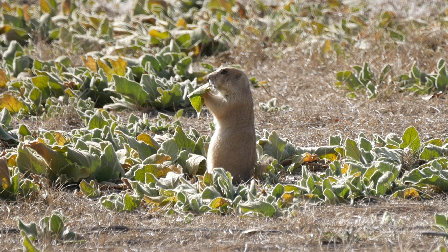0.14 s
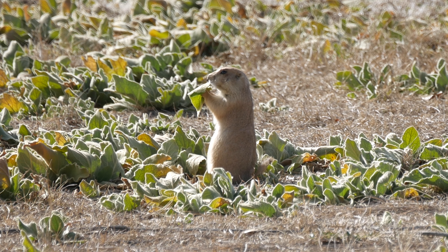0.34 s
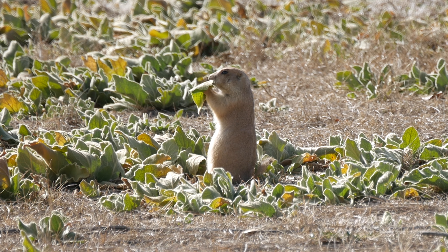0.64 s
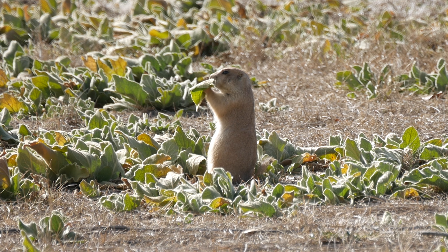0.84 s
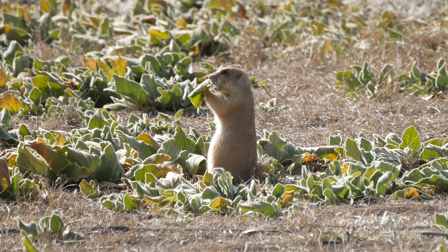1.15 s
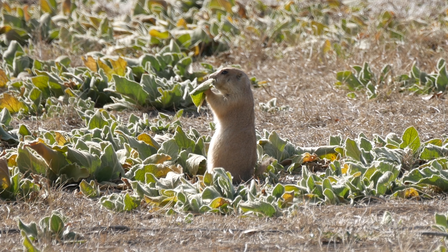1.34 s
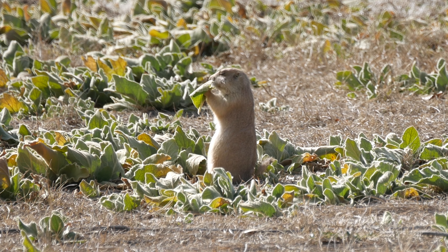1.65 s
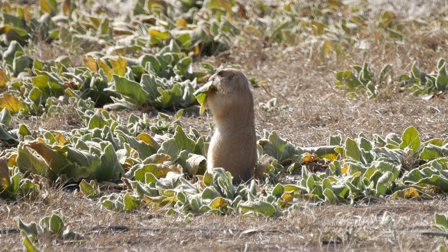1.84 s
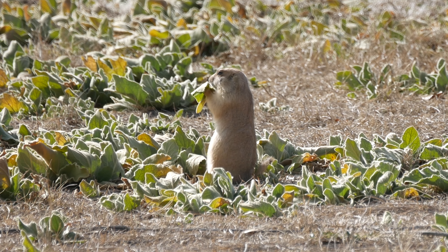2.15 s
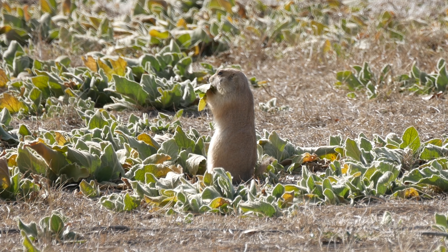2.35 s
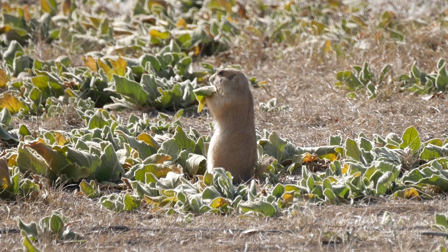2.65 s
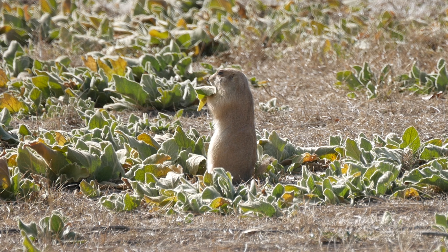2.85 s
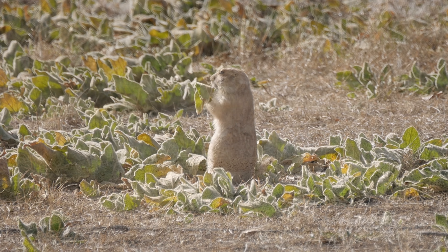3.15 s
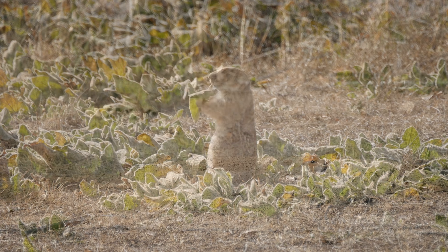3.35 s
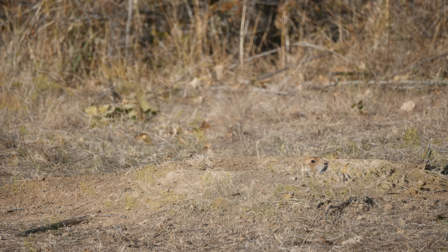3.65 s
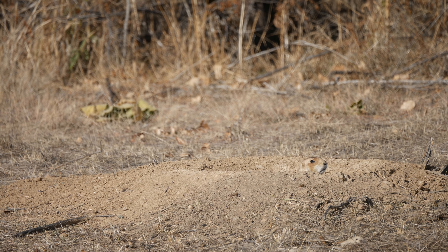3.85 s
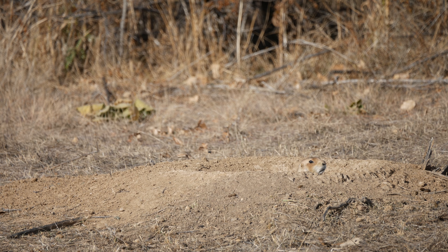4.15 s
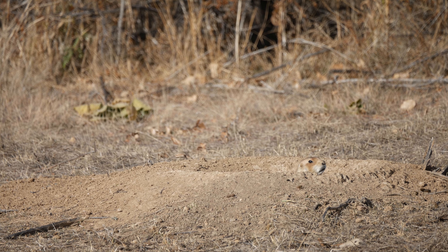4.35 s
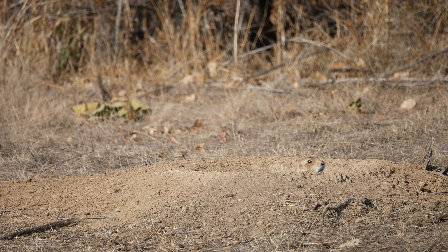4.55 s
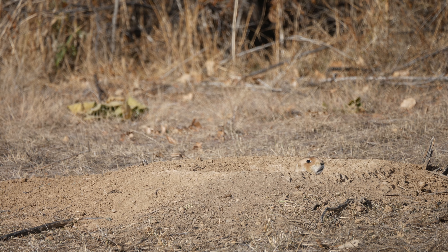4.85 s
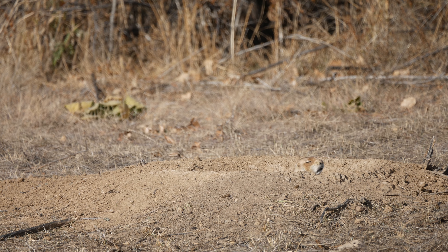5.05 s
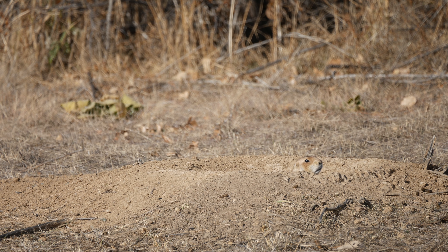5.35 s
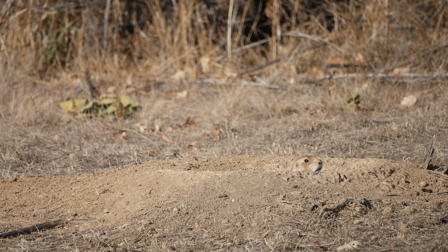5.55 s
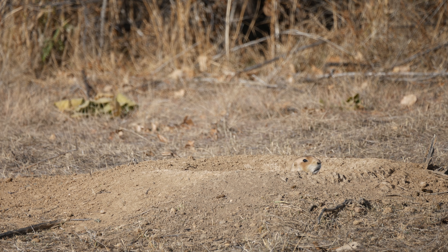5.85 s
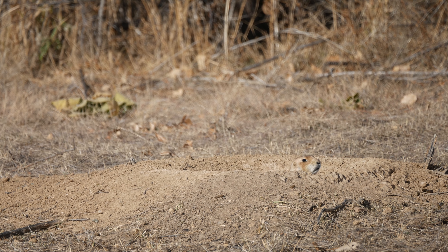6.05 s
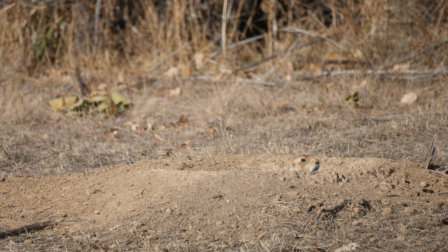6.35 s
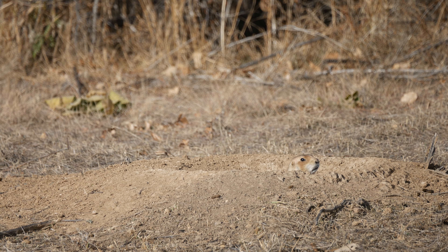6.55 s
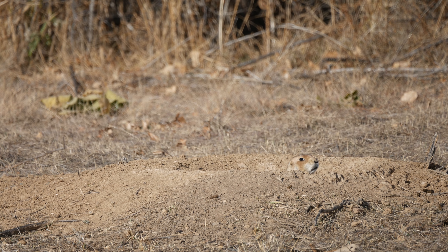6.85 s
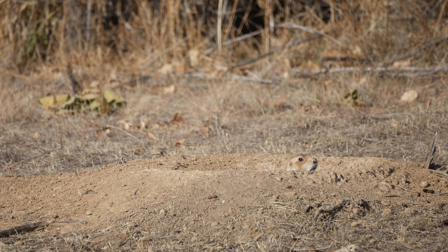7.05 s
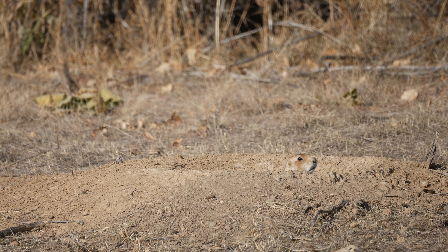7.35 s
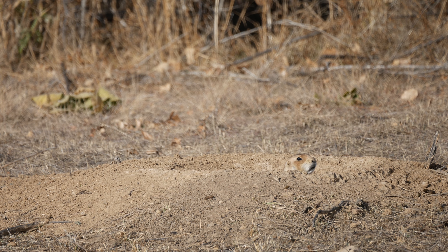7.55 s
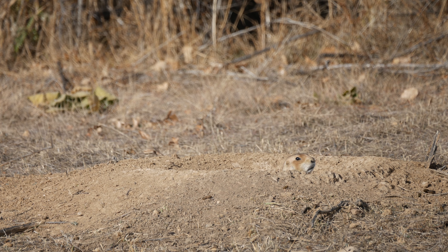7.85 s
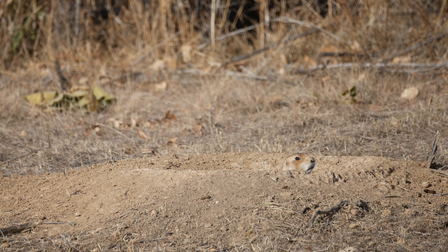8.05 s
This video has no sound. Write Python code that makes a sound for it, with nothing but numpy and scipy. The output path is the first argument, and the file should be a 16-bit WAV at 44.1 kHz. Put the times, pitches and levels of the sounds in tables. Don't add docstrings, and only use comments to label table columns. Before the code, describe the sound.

From 0 to 2.9 s, a distant prairie dog barks eight times in open grassland, short high yaps at irregular gaps of about a third to six tenths of a second, with a diffuse outdoor tail. Calm air and a faint low engine hum lie beneath. A dry snap comes near 0.5 s, a neighbour's rising yip at 0.7 s, and tiny wheezes around 1.2-1.4 s. The last far bark, at 2.9 s, is loudest; then silence until 3.2 s. Abruptly a close animal barks, hard, piercing and hoarse, repeating roughly every 0.4 s, with a longer gap around 5.6-6.2 s. Later barks are softer, lower and clearer, with thin falling wheezes after most. Wind rushes low over the microphone, thumping and droning, swelling near 5.4 and 7.3 s. Grass rustles early; stems snap around 6 s. After the last bark at 8.0 s, a quick arching chirp closes.

```python
import sys
import numpy as np
from scipy import signal
from scipy.fft import rfft, irfft, next_fast_len
from scipy.io import wavfile
from scipy.ndimage import uniform_filter1d

SR = 44100
rng = np.random.default_rng(int(sys.argv[2]) if len(sys.argv) > 2 else 0)


def int16_out(signal):
    q = np.round(np.clip(np.atleast_2d(signal).T, -1, 1) * 32767)
    wavfile.write(sys.argv[1], SR, q.astype(np.int16))


def elevation(decibels):
    levels = np.asarray(decibels, float)
    return 10 ** (levels / 20)


N = 362061
T = np.arange(N) / SR
SIZE = next_fast_len(N)
HZ = np.maximum(np.arange(SIZE // 2 + 1) * SR / SIZE, 1.)


def white():
    return rng.standard_normal(N)


def unit(x):
    return x / np.sqrt(np.mean(x ** 2))


def colour(x, points):
    hz, db = np.transpose(points)
    gain_db = np.interp(np.log(HZ), np.log(hz), db, left=-90, right=-90)
    return irfft(rfft(x, SIZE) * elevation(gain_db), SIZE)[:N]


def resonate(x, points):
    hz, db = np.transpose(points)
    grid_hz = np.maximum(np.arange(1025) * SR / 2048, 1.)
    gain_db = np.interp(np.log(grid_hz), np.log(hz), db, left=-70, right=-70)
    cepstrum = irfft(gain_db * np.log(10) / 20)
    cepstrum[1:1024] *= 2
    cepstrum[1025:] = 0
    impulse = irfft(np.exp(rfft(cepstrum)))
    return signal.oaconvolve(x, impulse)[:N]


def walk(rate_hz):
    hold = int(SR / rate_hz)
    steps = np.repeat(rng.standard_normal(N // hold + 1), hold)
    return 1.57 * uniform_filter1d(uniform_filter1d(steps, hold), hold)[:N]


def steady(x, seconds):
    size = int(seconds * SR)
    return x / np.sqrt(uniform_filter1d(uniform_filter1d(x ** 2, size), size))


def swells(rest_db, rows):
    bells = sum(elevation(db) ** 2 * np.exp(-((T - s) / wide_s) ** 2) for s, wide_s, db in rows)
    return np.sqrt(elevation(rest_db) ** 2 + bells)


def air(points, flicker_db, rate_hz):
    whole, out = rfft(colour(white(), points), SIZE), 0
    lowest, highest = np.floor(np.log2(points[0][0])), np.log2(points[-1][0])
    for octave in np.arange(lowest, highest + 1):
        band = irfft(whole * np.clip(1 - abs(np.log2(HZ) - octave), 0, 1), SIZE)[:N]
        out = out + band * elevation(flicker_db * walk(rate_hz))
    return unit(out)


def hiss():
    # hz, density_db
    hiss_spectrum = [(900, -14.5), (1500, 10.5), (3000, -10.5), (7000, -2.5), (12000, -1.5), (15600, 0.5)]
    return elevation(-81.5) * unit(colour(white(), hiss_spectrum))


def engine_hum():
    # order_hz, level_db
    orders = [(50.5, -69.5), (101, -71), (203, -76)]
    wavering = 1 + .006 * walk(2)
    out = np.zeros(N)
    for hz, db in orders:
        phase = 2 * np.pi * np.cumsum(hz * wavering) / SR
        out += elevation(db + 2 + 1.1 * walk(4.0)) * np.sin(phase)
    return out


def calm_air():
    # hz, density_db
    calm_spectrum = [(12, -30), (20, -11.5), (101, 4), (157, -9), (252, -13.5), (520, -16), (812, -15.5),
                     (1070, -21), (1230, -19), (2150, -29), (2760, -28.5), (3650, -36.5), (5550, -37),
                     (14300, -40), (15500, -41.5)]
    return elevation(-60.5) * air(calm_spectrum, flicker_db=0.34, rate_hz=7.76)


def membrane_thumps():
    # hz, density_db
    buffet_spectrum = [(12, 10.5), (22, 2), (40, -8), (60, -18), (100, -26)]
    # start_s, level_db
    eddies = [(3.29, -44), (3.5, -42), (3.66, -40.5), (3.77, -36), (4.05, -38.5), (4.16, -38), (4.33, -46),
              (4.5, -42), (4.74, -41), (4.92, -43.5), (5.02, -40), (5.4, -43.5), (5.55, -40), (5.7, -40.5),
              (5.85, -43), (5.99, -42.5), (6.15, -40), (6.44, -42.5), (6.62, -42), (6.76, -40),
              (6.99, -46.5), (7.2, -47), (7.52, -46), (7.64, -41)]
    gain = swells(-52, [(s, 0.047, db) for s, db in eddies])
    return gain * steady(colour(white(), buffet_spectrum), seconds=0.065)


def housing_drone(gust_db):
    # hz, density_db
    drone_spectrum = [(40, -8), (65, -4), (100, 0.2), (150, -7), (210, -4.5), (300, -19.5)]
    # centre_s, half_width_s, level_db
    drone_swells = [
        (3.85, .15, -53.5),
        (5.85, 0.73, -50),
        (6.8, .15, -48.5),
        (7.2, 0.074, -51),
    ]
    gain = swells(-53, drone_swells) * elevation(0.16 * (gust_db + 45.5) + 1.7 * walk(9))
    return gain * steady(air(drone_spectrum, flicker_db=1.0, rate_hz=18), seconds=0.15)


def gust_rush(gust_db):
    # hz, density_db
    rush_spectrum = [(88, -40), (150, -12), (255, -6.5), (369, 0.5), (473, -0.5), (581, -3.5), (907, -23),
                     (1060, -25.5), (1340, -37.5), (1810, -83), (2000, -56.5), (2600, -71.5), (4400, -120)]
    return elevation(gust_db + 0.18) * steady(air(rush_spectrum, flicker_db=1.5, rate_hz=20), seconds=0.1)


def grass_rustle():
    # hz, density_db
    rustle_spectrum = [(900, -2.5), (1300, 5.5), (2000, -0.5), (3000, -0.5), (4500, -5), (6000, -2),
                       (7000, -8), (11000, -12.5), (15500, -22)]
    # centre_s, half_width_s, level_db
    stirs = [
        (3.37, 0.075, -73),
        (3.55, 0.17, -73),
        (4.18, 0.077, -82),
        (5.42, 0.12, -79.5),
        (6.18, 0.07, -76.5),
        (6.46, 0.069, -82),
        (6.99, 0.026, -82),
        (7.52, .1, -86),
        (8.21, .05, -77),
    ]
    gain = elevation(7) * swells(-84.5, stirs)
    return gain * steady(air(rustle_spectrum, flicker_db=.7, rate_hz=35), seconds=.15)


def wind():
    # time_s, strength_db
    gusts = [(3.18, -41.5), (3.5, -47), (3.63, -50.5), (4.06, -46.5), (4.08, -43), (4.9, -51),
             (5.38, -39.5), (6.08, -45.5), (6.34, -43.5), (6.65, -48.5), (6.95, -45), (7.17, -38.5),
             (7.38, -37), (7.49, -46.5), (7.8, -48), (7.84, -52), (7.91, -47.5), (8.21, -49.5)]
    gust_db = np.interp(T, *np.transpose(gusts))
    return membrane_thumps() + housing_drone(gust_db) + gust_rush(gust_db) + grass_rustle()


def stem_ticks():
    # start_s, level_db, ring_hz
    snaps = [
        (0.489, -46, 2860),
        (3.3994, -57, 1210),
        (5.93, -51, 1220),
        (6.0704, -49, 1300),
        (6.106, -46, 1390),
    ]
    out, t = np.zeros(N), np.arange(400) / SR
    for s, db, hz in snaps:
        start = int(s * SR)
        body = 1.3 * rng.standard_normal(len(t)) + np.sin(2 * np.pi * hz * t)
        out[start:start + len(t)] += elevation(db) * np.exp(-t / 0.0016) * body
    return resonate(out, [(500, -23), (1300, -2.5), (4000, -13.0), (14000, -18)])


def field(x, spray_db, spray_t60_s, bank_s, bank_db, tail_db, tail_t60_s):
    t = np.arange(int(.6 * SR)) / SR
    spray, bank, tail = rng.standard_normal((3, len(t)))

    def decay(t60_s, lag_s):
        fall = elevation(-60 * np.maximum(t - lag_s, 0) / t60_s)
        return (t > lag_s) * fall / np.sqrt(t60_s * SR)

    hump = np.exp(-((t - bank_s) / .03) ** 2) / np.sqrt(.04 * SR)
    tail = signal.sosfilt(signal.butter(1, 4500, fs=SR, output="sos"), tail)
    answer = elevation(spray_db) * spray * decay(spray_t60_s, 0.011)
    answer += elevation(bank_db) * bank * hump
    answer += elevation(tail_db) * tail * decay(tail_t60_s, 0.062)
    return x + signal.fftconvolve(x, answer)[:N]


def voice(calls, throat, jitter, breath_db, patchy_db, odd_db=0):
    # hz, level_db
    flutter_spectrum = [(60, -9), (200, -7), (480, -15), (680, -2), (780, 0), (900, -12), (1500, -26),
                        (3000, -40)]
    throat_hz, throat_db = np.transpose(throat)
    flutter = unit(resonate(white(), flutter_spectrum))
    wobble, patches, breath, source = walk(400), walk(90), white(), np.zeros(N)
    for call in calls:
        s, hz, db, hoarse = np.transpose(call)
        span = slice(int(s[0] * SR), min(int(s[-1] * SR), N))
        hz, db, hoarse = (np.interp(T[span], s, column) for column in (hz, db, hoarse))
        hz = uniform_filter1d(hz, 150, mode="nearest") * (1 + jitter * (1 + 6 * hoarse) * wobble[span])
        k = np.arange(1, int(15500 / hz.max()) + 1)[:, None]
        phase = 2 * np.pi * np.cumsum(hz) / SR + .3 * hoarse * flutter[::-1][span]
        own_patch = patches[(np.arange(span.start, span.stop) + 9000 * k) % N]
        own_db = patchy_db * own_patch + odd_db * (k % 2) * (k > 3)
        stack = (elevation(own_db) * np.cos(k * phase + 0.33 * k ** 2)).sum(axis=0)
        share = np.clip(hoarse, 0, .95)
        stack *= np.sqrt(1 - share ** 2) + share * unit(flutter[span])
        stack += elevation(breath_db) * breath[span]
        partial_db = np.interp(np.log(k * hz.mean()), np.log(throat_hz), throat_db, left=-90, right=-90)
        through = np.sqrt(np.sum(elevation(partial_db) ** 2) / 2)
        source[span] += stack * elevation(db) / through
    return resonate(source, throat)


def wheezes():
    # start_s, length_s, start_hz, level_db
    breaths = [(1.194, 0.053, 1283, -73), (1.377, 0.039, 1290, -74), (4.195, 0.043, 1275, -69),
               (4.634, .035, 1305, -72), (4.971, 0.039, 1090, -66.5), (5.011, 0.058, 1130, -63.5),
               (5.322, .015, 1020, -72), (5.349, 0.046, 1000, -73), (5.693, .012, 1135, -63.5),
               (5.713, 0.068, 1095, -66.5), (6.35, 0.028, 1016, -69), (6.386, 0.04, 1100, -70.5),
               (6.694, 0.026, 1050, -67), (6.727, .045, 1100, -68), (7.072, 0.018, 1190, -63.5),
               (7.109, 0.056, 1128, -64), (7.476, 0.026, 1185, -62), (7.508, 0.053, 1170, -65),
               (7.844, 0.036, 1190, -62.5), (7.889, 0.035, 1172, -64.5)]
    # hz, level_db
    throat = [(600, -48.5), (1100, 4.5), (2200, 4.5), (3300, -4.5), (4500, -17.5), (7000, -27)]
    hoarse, calls = .14, []
    for s, length_s, hz, db in breaths:
        end_hz = 0.93 * hz
        calls.append([(s, hz, db, hoarse), (s + 0.19 * length_s, hz, db, hoarse),
                      (s + .8 * length_s, end_hz, db - 3.5, hoarse), (s + length_s, end_hz, db - 9.5, hoarse)])
    return voice(calls, throat, jitter=.006, breath_db=2, patchy_db=2)


def neighbour_yip():
    # time_s, pitch_hz, level_db, hoarseness_0_1
    contour = [
        (.628, 476, -79, .1),
        (.64, 490, -65, .1),
        (.658, 527, -54.5, .12),
        (.7, 608, -48.5, 0.1),
        (.718, 641, -45.5, .1),
        (.738, 728, -47, 0.2),
        (.75, 809, -47.5, .15),
        (.762, 718, -57, .2),
        (.775, 640, -65, .2),
    ]
    # hz, level_db
    throat = [(450, -40), (700, -14), (1100, -12), (1600, -1), (2000, -8.5), (2550, 2), (3100, -12),
              (3700, -13), (4900, -5), (6000, -13.5), (7600, -23), (8400, -31), (10000, -21), (14000, -53)]
    yip = voice([contour], throat, jitter=.004, breath_db=1, patchy_db=1.8, odd_db=-6)
    return field(yip, spray_db=0, spray_t60_s=.09, bank_s=.05, bank_db=-20, tail_db=-19, tail_t60_s=.4)


def closing_chirp():
    # time_s, pitch_hz, level_db, hoarseness_0_1
    contour = [
        (8.08, 1460, -59, .05),
        (8.095, 1840, -54, 0.1),
        (8.115, 2140, -58, 0.14),
        (8.13, 1950, -55, .05),
        (8.148, 1535, -66, .05),
        (8.16, 1240, -61, .05),
    ]
    # hz, level_db
    throat = [(800, -3), (2000, 8), (4000, -12), (6200, -16), (9000, -40)]
    return voice([contour], throat, jitter=.004, breath_db=-4, patchy_db=3)


def bark_contours(rows):
    # length_share, hard_rise_0_1, soft_rise_0_1 (from end pitch to top), level_db, hoarseness_share
    bark_shape = [
        (0, 0.21, 0.095, -14, .1),
        (.04, 0.3, 0.34, -8, .1),
        (0.161, .92, .6, -3, 0.18),
        (.27, 1, .92, -2, 0.92),
        (.42, .86, 0.97, -2.5, 0.96),
        (.66, .68, 0.79, -5.5, 0.47),
        (.84, .45, 0.663, -8, 0.15),
        (.95, 0, 0.025, -12.5, .4),
        (1.02, -.3, -0.59, -34, .9),
    ]
    share, hard_rise, soft_rise, shape_db, hoarse_share = np.transpose(bark_shape)
    contours = []
    for s, length_s, top_hz, db, hoarse in rows:
        end_hz = 1306.7 + 50.3 * hoarse
        hardness = np.clip((top_hz - 1440) / 150, 0, 1)
        rise = soft_rise + (hard_rise - soft_rise) * hardness
        pitch_hz = end_hz + (top_hz - end_hz) * rise
        contours.append(np.transpose([s + length_s * share, pitch_hz, db + shape_db, hoarse * hoarse_share]))
    return contours


def far_barks():
    # start_s, length_s, top_hz, level_db, hoarseness_0_1
    far_rows = [
        (.043, 0.056, 1373, -51.5, 0.06),
        (.380, 0.061, 1433, -48.5, 0.63),
        (1.002, 0.058, 1442, -50.5, 0.24),
        (1.435, 0.042, 1399, -51, .15),
        (1.796, 0.049, 1524, -47, 0.28),
        (2.163, 0.0548, 1482, -48.5, 0.3),
        (2.523, 0.053, 1426, -49.5, 0),
        (2.882, 0.083, 1494, -45, 0.15),
    ]
    # hz, level_db
    throat = [(1000, -38), (1450, -9), (2100, -5), (2800, 9), (3500, 0.5), (4250, -6.5), (4900, -7.5),
              (5700, 4.5), (7100, 1), (7900, -24), (8600, -17.5), (11000, -24.5), (15000, -36.5)]
    return voice(bark_contours(far_rows), throat, jitter=.007, breath_db=-4, patchy_db=2.5)


def near_barks():
    # start_s, length_s, top_hz, level_db, hoarseness_0_1
    near_rows = [(3.180, 0.058, 1723, -24, 0.57), (3.653, 0.065, 1624, -26.5, 0.85),
                 (4.018, 0.067, 1623, -25.5, 0.55), (4.443, 0.062, 1677, -25, 0.27),
                 (4.827, 0.06, 1607, -27, 0.09), (5.179, 0.052, 1526, -29, 0.091),
                 (5.549, 0.059, 1478, -31.5, 0.037), (6.203, 0.06, 1516, -32, 0.021),
                 (6.542, 0.053, 1542, -30, 0.088), (6.921, 0.063, 1447, -33, 0.022),
                 (7.322, 0.065, 1459, -33, 0.027), (7.692, 0.058, 1444, -32.5, 0.058),
                 (8.041, 0.052, 1454, -31.5, 0.094)]
    # hz, level_db
    throat = [(1000, -17), (1550, -25), (2000, -17), (2400, -15.5), (3050, 0.27), (3900, -8), (4600, -18),
              (5900, -12), (7200, -14.5), (8100, -25.5), (9100, -26), (9700, -42), (11200, -30.5),
              (15600, -54)]
    near = voice(bark_contours(near_rows), throat, jitter=0.005, breath_db=-19.0, patchy_db=1.5)
    treble = resonate(near, [(3300, -40), (4000, 0), (7600, 0), (8300, -30)])
    treble_db = 1.6 * np.clip((T - 5.5) / 1.5, 0, 1)
    return near + treble * (elevation(treble_db) - 1)


def capsules(mid, open_gain):
    # hz, density_db
    self_noise = [(18, -19), (30, -19.5), (79, -37.5), (148, -47.5), (324, -20.5), (899, -2.5),
                  (1080, -2.5), (2130, -5), (2690, -5.5), (15500, -8)]
    smear_taps = np.convolve(rng.standard_normal(1600) / 40, [1, -.75])
    smear = elevation(-24) * signal.oaconvolve(mid, smear_taps)[:N]
    noise = elevation(-81) * unit(colour(white(), self_noise)) * open_gain
    return mid + (smear + noise) * np.array([[1], [-1]])


def scene():
    # far_end_s, near_start_s
    cut_s = (2.926, 3.177)
    small = wheezes() + stem_ticks()
    far = field(far_barks() + elevation(3.0) * small, spray_db=9.7, spray_t60_s=0.16, bank_s=0.042, bank_db=-20.0,
                tail_db=-8.5, tail_t60_s=0.65)
    far = far + neighbour_yip() + calm_air() + engine_hum()
    near = field(near_barks() + small + closing_chirp(), spray_db=-4, spray_t60_s=0.15, bank_s=0.026,
                 bank_db=-19.0, tail_db=-20.5, tail_t60_s=0.56)
    near = near + wind() + hiss()
    fade_out = np.clip((cut_s[0] - T) / 0.0072, 0, 1)
    fade_in = np.clip((T - cut_s[1]) / 0.00064, 0, 1)
    return capsules(far * fade_out + near * fade_in, fade_out + fade_in)


def top_cut(x):
    return signal.sosfilt(signal.butter(12, 15690, fs=SR, output="sos"), x)


def record(dry):
    return top_cut(dry)


dry = scene()
out = record(dry)
int16_out(out)
```